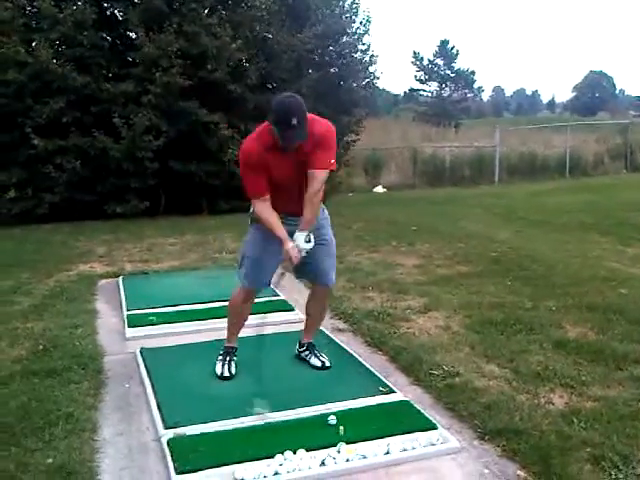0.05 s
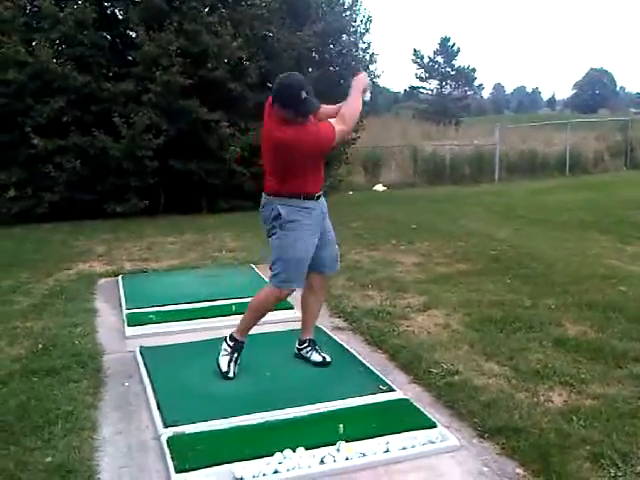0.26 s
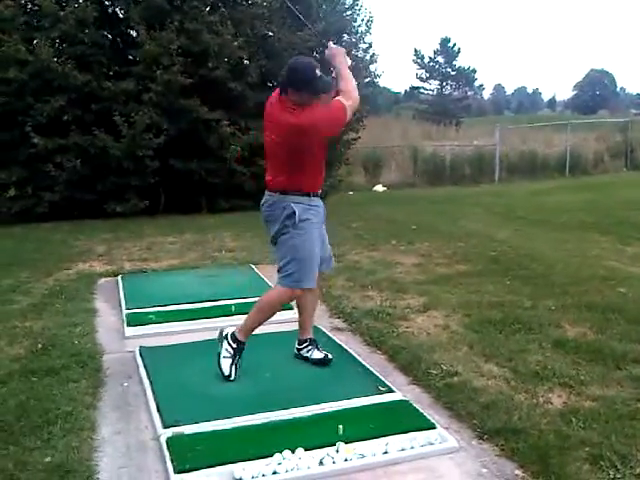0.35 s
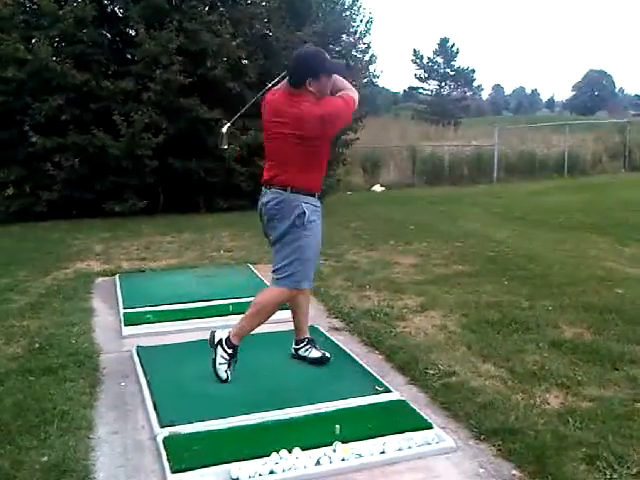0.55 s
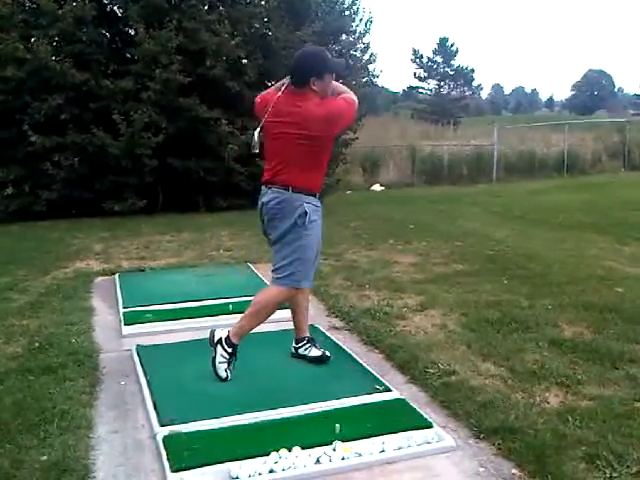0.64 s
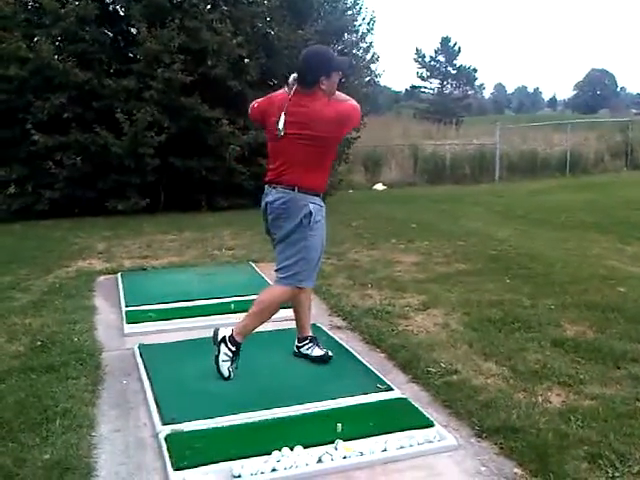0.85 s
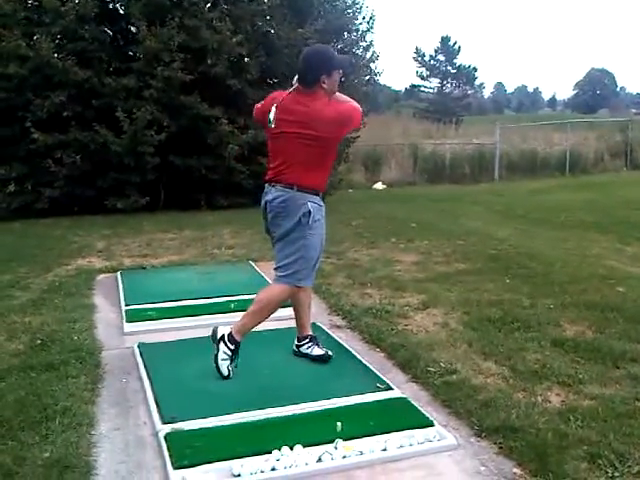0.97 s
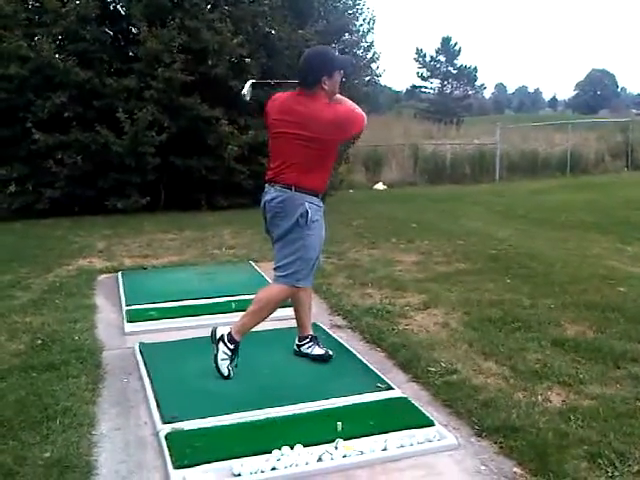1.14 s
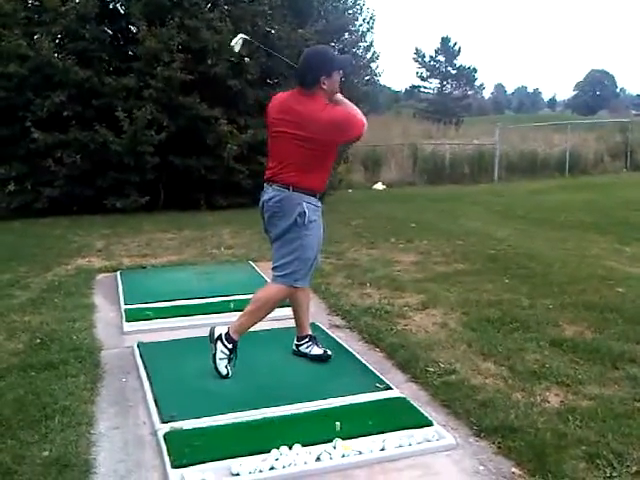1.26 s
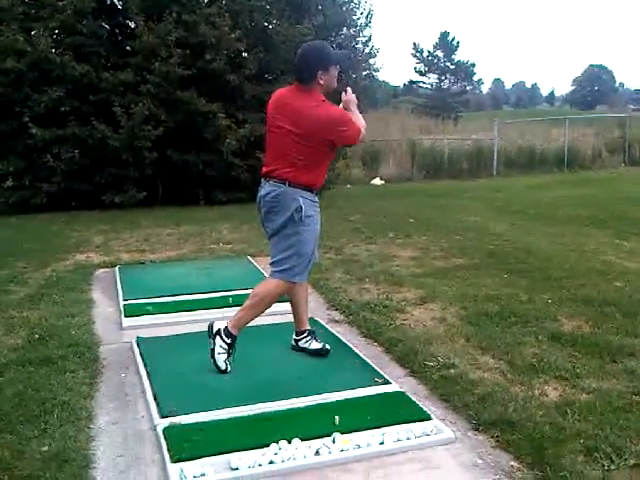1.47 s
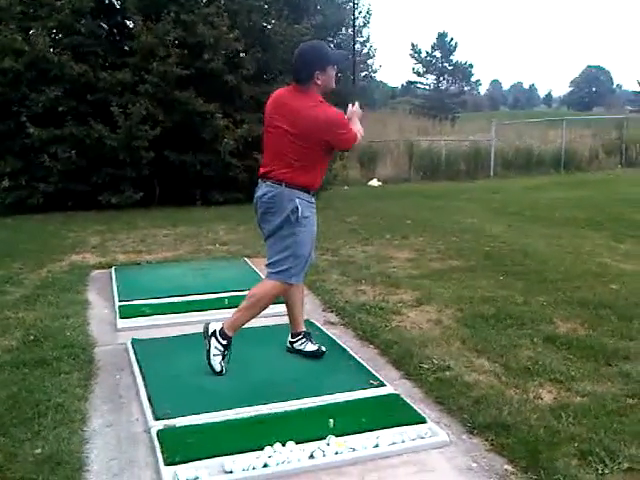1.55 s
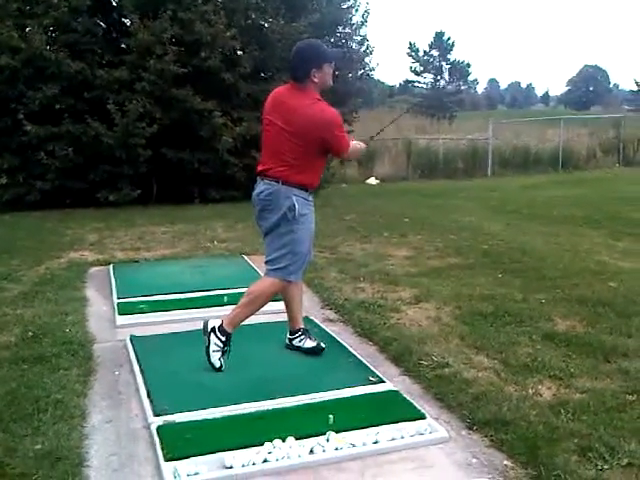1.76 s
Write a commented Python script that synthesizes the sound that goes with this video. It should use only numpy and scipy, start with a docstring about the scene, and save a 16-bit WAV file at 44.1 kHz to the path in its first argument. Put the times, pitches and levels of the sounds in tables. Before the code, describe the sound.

One sharp golf shot with a quick swish, followed by low gusts of wind.

```python
"""An open golf range, one microphone a few metres from the mat, over a faint outdoor hiss.
An iron swings down, its shaft whistling higher as it speeds up. At 0.22 s it cracks the ball away:
a hard click, a brief ring, a scuff and thud of the mat, all scattered by nearby trees.
The club swishes on and a faint echo returns from the tree line.
Afterwards gusts buffet the microphone, and the golfer's clothes rustle faintly."""
import sys
import numpy as np
from scipy import signal
from scipy.fft import rfft, irfft
from scipy.io import wavfile
from scipy.ndimage import uniform_filter1d

SR = 44100
rng = np.random.default_rng(int(sys.argv[2]) if len(sys.argv) > 2 else 0)


def file_out(sig):
    """Save sig as 16-bit WAV at sys.argv[1]."""
    # one column per channel
    cols = np.atleast_2d(sig).T
    # limit, then scale
    lim = np.clip(cols, -1, 1)
    pcm = np.round(lim * 32767).astype(np.int16)
    wavfile.write(sys.argv[1], SR, pcm)


N = 79380
STRIKE_S = 0.2176

# the club's sole scuffing the mat, also heard in the far tail (frequency [Hz], level [dB])
SCUFF_SPECTRUM = [(150, -33), (500, 8), (1500, 0), (3200, 2), (4600, -6), (5400, -4.5), (6700, -10),
                  (8500, -39)]


def undb(db):
    """Decibels to gain."""
    return 10 ** (np.asarray(db) / 20)


def curve(rows, t):
    """Straight lines through (time [s], value) rows."""
    return np.interp(t, *np.array(rows).T)


def noise(points):
    """Noise of rms 1, shaped by (frequency [Hz], level [dB]) points and falling off below the first."""
    hz, db = np.array(points).T
    freqs = np.maximum(np.arange(N // 2 + 1) * SR / N, 1)
    gain = undb(np.interp(np.log(freqs), np.log(hz), db)) * np.minimum(freqs / hz[0], 1)
    shaped = irfft(rfft(rng.standard_normal(N)) * gain, N)
    return shaped / shaped.std()


def waver(rate_hz):
    """Random levels, each held 1 / rate_hz seconds, smoothed twice; spread 1."""
    hold = int(SR / rate_hz)
    steps = rng.standard_normal(N)[np.arange(N) // hold]
    smooth = uniform_filter1d(uniform_filter1d(steps, hold), hold)
    return smooth / smooth.std()


def fade(age, t60_s):
    """Decay by 60 dB in t60_s, from age 0 on."""
    return np.exp(-np.log(1000) * np.maximum(age, 0) / t60_s)


def rise(age, rise_s):
    """Silent before age 0, then a quick rise to 1."""
    return 1 - np.exp(-np.maximum(age, 0) / rise_s)


def swell(age, width_s):
    """A bell-shaped envelope centred on age 0."""
    return np.exp(-(age / width_s) ** 2)


def pulse(age, hz, width_s):
    """A pressure push and pull centred on age 0."""
    return -np.sin(2 * np.pi * hz * age) * swell(age, width_s)


def field_hiss(t):
    """The open field all around gives a faint, slightly wavering hiss."""
    # colour of the hiss (frequency [Hz], level [dB])
    spectrum = [(30, 0), (100, 5), (300, -3.5), (700, 3.5), (1300, -2.5), (2500, -7.5), (4300, -11.5),
                (5500, -17.5), (7000, -18), (8500, -40.5)]
    # its slow drift (time [s], level [dB])
    drift = [(0, -70), (.35, -73), (.52, -71), (.68, -74), (.93, -73.5), (1.15, -72.5), (1.35, -74),
             (1.55, -71.5), (1.8, -73)]
    return noise(spectrum) * undb(curve(drift, t) + 2.17 * waver(rate_hz=9.65))


def gusts(t):
    """Wind right on the microphone rumbles, and adds a brighter flutter when it blows hard."""
    # strength of the wind (time [s], relative level [dB])
    strength = [(0.0, -62), (0.104, -70), (0.224, -76), (0.274, -64.5), (0.334, -51), (0.366, -66),
                (0.396, -51.5), (0.446, -69), (0.48, -51.5), (0.56, -70), (0.63, -53), (0.656, -65),
                (0.676, -45), (0.802, -47.5), (0.952, -42), (0.976, -50), (1.066, -49), (1.102, -45.5),
                (1.162, -45.5), (1.258, -43.5), (1.312, -63), (1.382, -48), (1.408, -66.5), (1.432, -46),
                (1.538, -50.5), (1.548, -73), (1.598, -49), (1.638, -69.5), (1.668, -53), (1.688, -85),
                (1.724, -49.5), (1.8, -76)]
    # colour of the rumble (frequency [Hz], level [dB])
    rumble_spectrum = [(25, -17), (50, -2.5), (100, 4.5), (160, 0.5), (220, -7), (320, -26.5), (450, -40),
                       (800, -71)]
    # colour of the flutter (frequency [Hz], level [dB])
    flutter_spectrum = [(110, -10.5), (210, 1.5), (280, -1.5), (380, -8.5), (600, -27), (1000, -30.5),
                        (2000, -65.5)]
    strongest_db, steady_s = -42, 0.022
    gust_db = curve(strength, t)
    rumble = noise(rumble_spectrum)
    rumble /= np.sqrt(uniform_filter1d(rumble ** 2, int(steady_s * SR)))  # even out its own swells
    flutter = noise(flutter_spectrum)
    flutter_db = -52 + 1.7 * (gust_db - strongest_db) + 2 * waver(rate_hz=60)
    return rumble * undb(gust_db - 1.5) + flutter * undb(flutter_db)


def eddies(t):
    """Single eddies hit the microphone, each a low thump with a sharp spit on top."""
    # eddies (time [s], relative thump level [dB], thump frequency [Hz], relative spit level [dB])
    hits = [(0.302, -45, 126, -80), (0.333, -42.5, 108.3, -73), (0.391, -45.5, 139, -77),
            (0.682, -48.5, 170, -68), (0.758, -37, 259, -47), (.788, -31, 164.6, -68),
            (0.8161, -28.5, 170, -51.5), (.862, -36, 165, -59), (.894, -33, 230, -41.5),
            (.926, -34, 201, -43), (.958, -42.5, 231, -45.5), (.966, -34, 211, -38.5),
            (.98, -30, 141, -62.5), (.991, -31.5, 216, -43), (1.025, -32.5, 174.6, -50),
            (1.092, -36, 200, -54), (1.14, -39.5, 226, -50), (1.255, -37.5, 150, -66),
            (1.379, -43.5, 110, -67), (1.433, -36.5, 185, -53), (1.444, -40, 193.6, -57.5),
            (1.461, -42, 199, -55), (1.525, -38, 223, -56.5), (1.577, -42.5, 194, -57),
            (1.601, -51.5, 155, -68), (1.722, -47.5, 197, -62)]
    buffets = np.zeros(N)
    for at, thump_db, hz, spit_db in hits:
        thump = undb(thump_db - 1.5) * pulse(t - at, hz, width_s=0.57 / hz)
        spit = undb(spit_db - 2.5) * pulse(t - at, hz=406, width_s=0.0014)
        buffets += thump + spit
    return buffets


def brushes(t):
    """The club grazes the mat once more, and clothes rustle faintly as the golfer unwinds."""
    # light touches (time [s], half length [s], level [dB], centre frequency [Hz])
    touches = [(0.25, 0.0024, -53, 1500), (0.933, 0.03, -82, 4120), (1.508, 0.026, -84, 3090),
               (1.619, 0.021, -76.5, 4320), (1.638, 0.022, -71.5, 750)]
    skirt_db_per_octave = -30
    rustle = np.zeros(N)
    for at, width_s, db, hz in touches:
        band = [(hz * 2.0 ** octave, skirt_db_per_octave * abs(octave)) for octave in range(-2, 3)]
        rustle += undb(db) * swell(t - at, width_s) * noise(band)
    return rustle


def tree_scatter(t, crack):
    """Ground and nearby trees scatter the crack into a short tail; the tree line echoes it faintly."""
    # colour that ground and trees give to the crack (frequency [Hz], level [dB])
    spectrum = [(120, -2), (250, 6), (600, 6), (1500, -4.5), (3000, -7.5), (4500, 2), (5400, 4.5),
                (6300, -0.5), (8500, -1)]
    rise_s, t60_s, echo_at_s = 0.0013, 0.21, 0.405
    paths = noise(spectrum) * rise(t, rise_s) * fade(t, t60_s)
    tail = signal.fftconvolve(crack, paths / np.linalg.norm(paths))[:N]
    age = t - STRIKE_S
    diffuse = undb(-54) * rise(age, rise_s) * fade(age, t60_s)  # leaves and grass smear it into noise
    echo = undb(-74) * swell(t - echo_at_s, width_s=0.046)
    return undb(-17.5) * tail + (diffuse + echo) * noise(SCUFF_SPECTRUM)


def club_swish(t):
    """Vortices shed by the shaft whistle at a pitch that follows its speed; the head adds a rush."""
    # the swing (time [s], speed [share of full speed])
    swing = [(.08, .25), (.135, 0.47), (.165, 0.74), (.188, 1.004), (.213, 0.99), (.24, 0.46), (.275, 0.48),
             (.33, 0.077)]
    # air torn by the club head (frequency [Hz], level [dB])
    rush_spectrum = [(300, 6), (900, 0), (2000, -3), (3700, -5), (5300, -14.5), (6500, -19.5),
                     (8500, -40.5)]
    full_speed_hz, bandwidth_hz = 640, 320
    speed = curve(swing, t)
    phase = 2 * np.pi * np.cumsum(full_speed_hz * speed) / SR
    whistle = (waver(bandwidth_hz) * np.sin(phase) + waver(bandwidth_hz) * np.cos(phase)) / np.sqrt(2)
    return undb(-49) * speed ** 3 * whistle + undb(-55) * speed ** 6.3 * noise(rush_spectrum)


def mat_thud(t):
    """The mat gives under the club with a soft low thud."""
    # colour of the thud (frequency [Hz], level [dB])
    spectrum = [(70, -9.5), (170, 6.5), (250, 1.5), (340, -8), (700, -36)]
    age = t - STRIKE_S
    return undb(-52.5) * noise(spectrum) * rise(age, rise_s=0.0095) * fade(age, t60_s=0.19)


def ball_strike(t):
    """A few metres off, iron meets ball: contact clicks, the ball pings, the head rings, the sole scuffs."""
    # modes of the club head (frequency [Hz])
    mode_hz = [463, 595, 762, 953, 1297, 1440, 1730, 2043, 2510, 2647, 3245, 3930, 4560, 4990]
    # strength of each mode (relative level [dB])
    mode_db = [-18.5, -16.5, -13.5, -15, -2.5, -7, -0.5, 4, -5, 0, 5, -7.5, -2, -9.5]
    contact_s, ball_hz, rise_s = 0.00013, 6240, 0.0016
    scuff_lag_s, scuff_hold_s = 0.001, 0.005
    age = t - STRIKE_S
    click = undb(-11.5) * pulse(age - contact_s, hz=2770, width_s=contact_s)
    ping = undb(-26) * np.sin(2 * np.pi * ball_hz * age) * rise(age, contact_s) * fade(age, t60_s=0.01)
    modes = np.zeros(N)
    for k, (hz, db) in enumerate(zip(mode_hz, mode_db)):
        t60_s = 0.025 * (2003 / hz) ** 0.44  # low modes last a little longer
        modes += (-1) ** k * undb(db) * np.sin(2 * np.pi * hz * age) * fade(age, t60_s)
    ring = undb(-28) * modes * rise(age, rise_s)
    scuff_age = age - scuff_lag_s
    scuff_envelope = rise(scuff_age, rise_s) * fade(scuff_age - scuff_hold_s, t60_s=0.013)
    scuff = undb(-36) * noise(SCUFF_SPECTRUM) * scuff_envelope
    return click + ping + ring + scuff


def scene():
    """Swing, strike and weather meet at one microphone in the open."""
    t = np.arange(N) / SR
    crack = ball_strike(t)
    shot = crack + tree_scatter(t, crack) + mat_thud(t) + club_swish(t)
    return (shot + brushes(t) + gusts(t) + eddies(t) + field_hiss(t))[None]


def record(dry):
    """The recorder thins the deep bass and cuts the top steeply."""
    low_cut_hz, top_hz = 51, 8764
    low_cut = signal.butter(3, low_cut_hz, "high", fs=SR, output="sos")
    top_cut = signal.ellip(8, .2, 70, top_hz, fs=SR, output="sos")
    return signal.sosfilt(top_cut, signal.sosfilt(low_cut, dry))


dry = scene()
out = record(dry)
file_out(out)
```